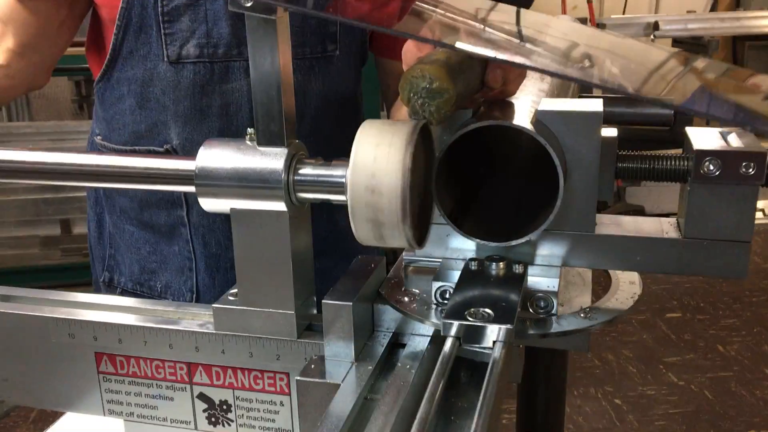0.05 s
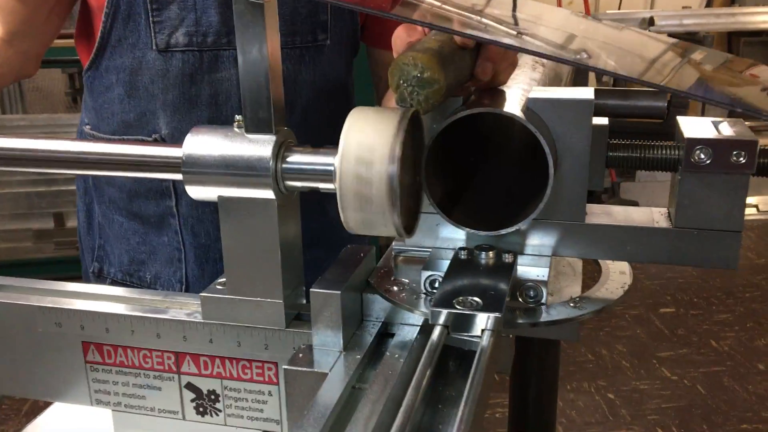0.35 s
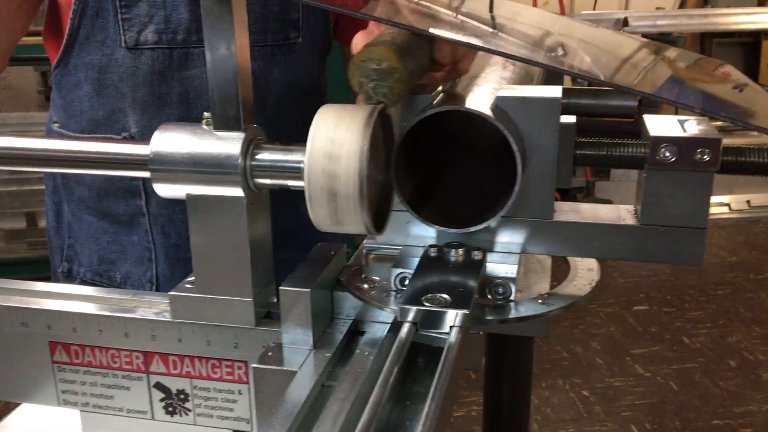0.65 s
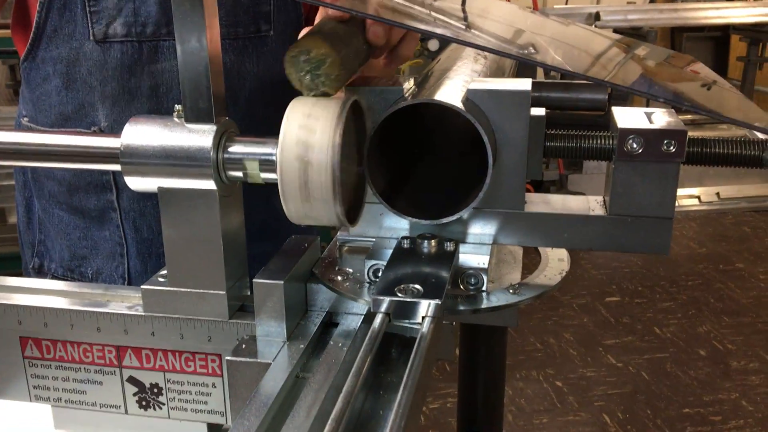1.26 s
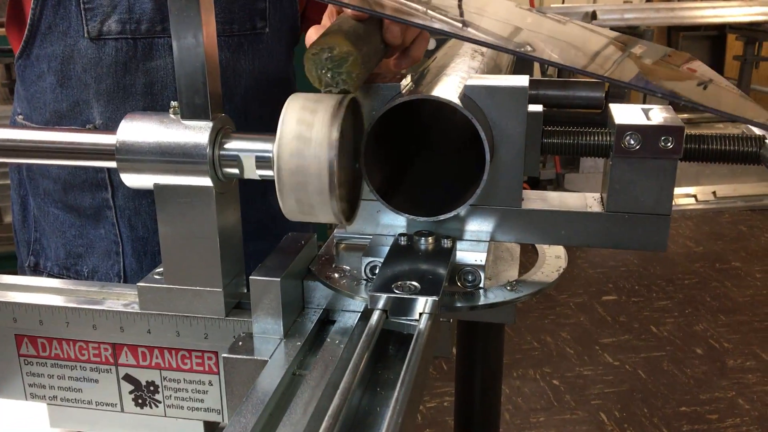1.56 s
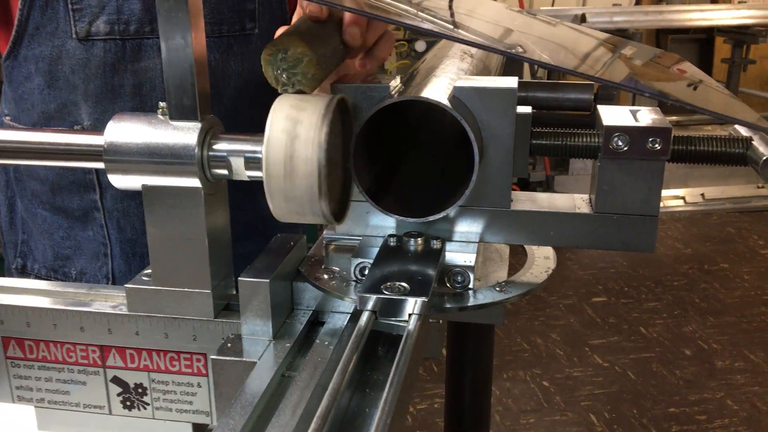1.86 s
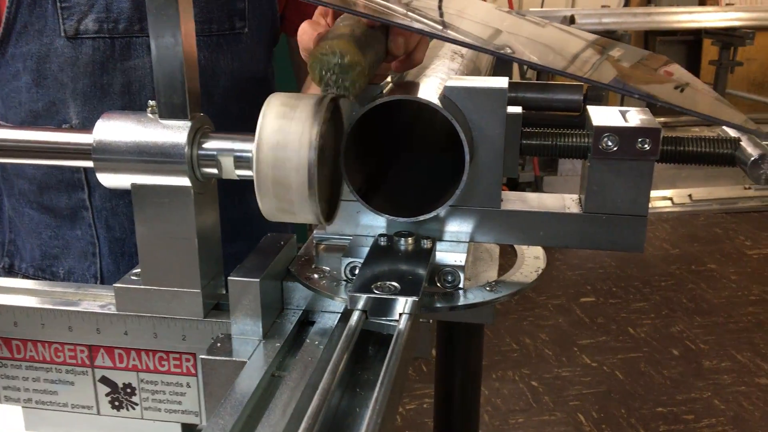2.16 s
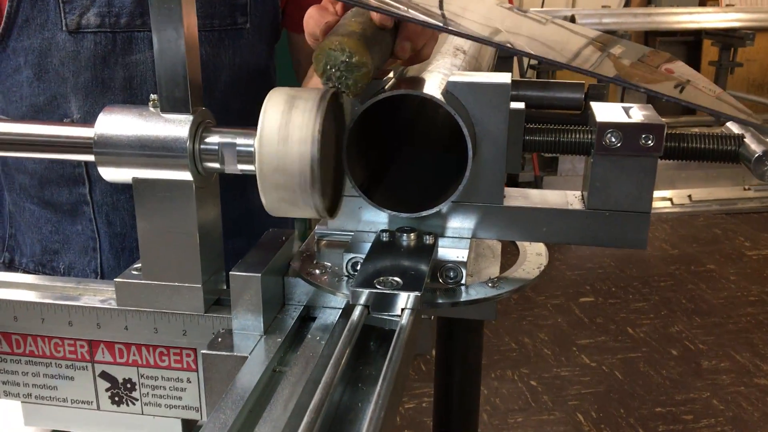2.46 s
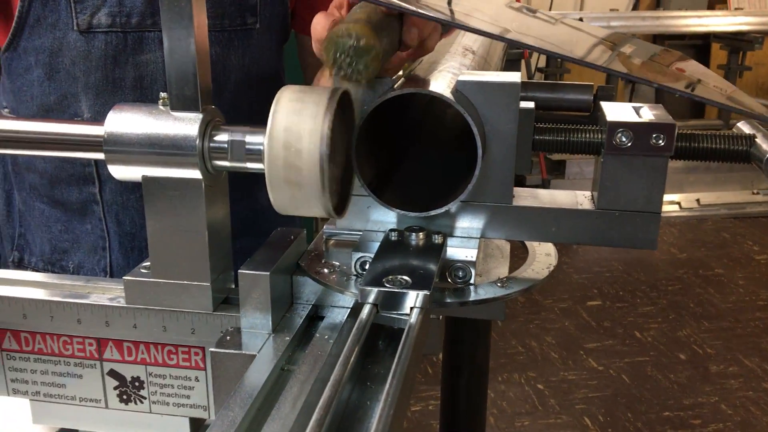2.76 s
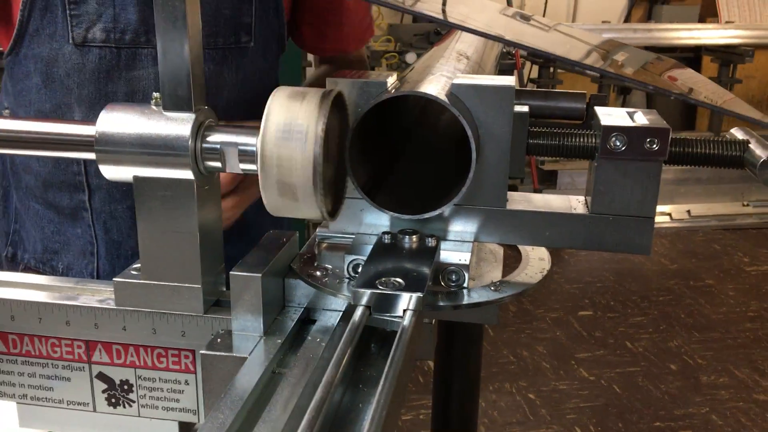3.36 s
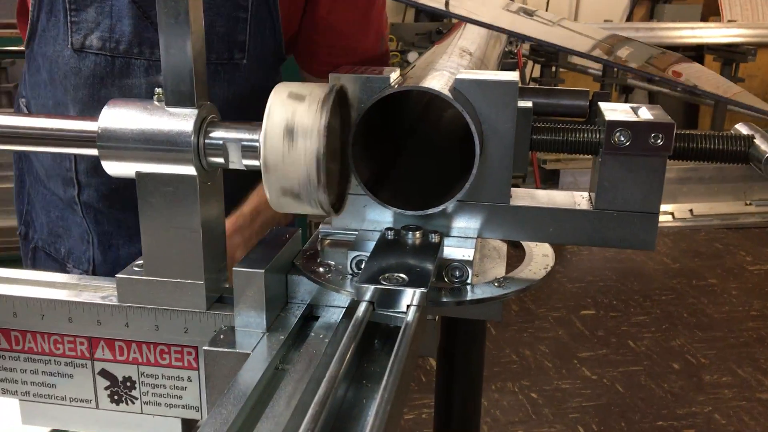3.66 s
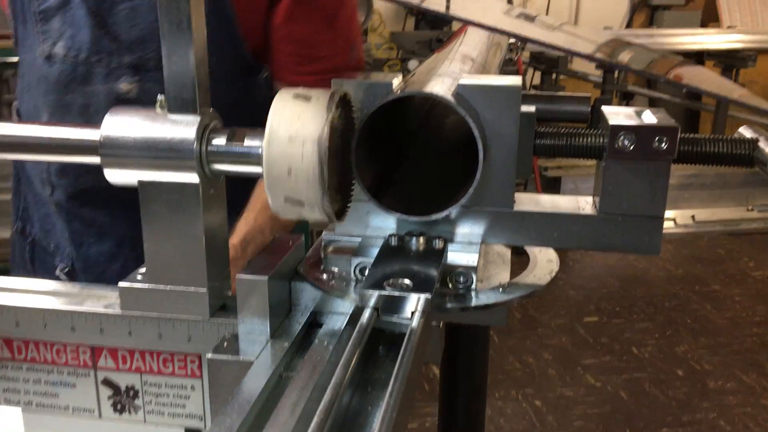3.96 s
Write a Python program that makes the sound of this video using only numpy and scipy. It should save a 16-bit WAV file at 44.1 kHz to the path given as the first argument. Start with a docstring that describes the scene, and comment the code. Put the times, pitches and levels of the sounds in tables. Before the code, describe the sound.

A tubing notcher's electric drill whirs loudly at full speed from the start, close by in a workshop, with high tones over gently pulsing fan air and gear rattle. At about 2.9 seconds it switches off and coasts down, its gears giving a rasping whine that falls in pitch and fades. At about 3.9 seconds, as it nearly stops, a dull thump briefly rings the steel frame.

```python
"""A workshop, one microphone close to a tubing notcher whose hole saw an electric drill spins in the air.
At first the drill runs at full speed: shaft tones sing over fan air and gear rattle, and air and rattle
pulse with the turning of a slow gear. Near 2.9 s it is switched off and coasts down with a falling
whine in its gearbox. At 3.9 s a dull thump rings the steel frame."""
import sys
import numpy as np
from scipy import signal
from scipy.fft import rfft, irfft, next_fast_len
from scipy.io import wavfile
from scipy.ndimage import uniform_filter1d, map_coordinates

SR = 44100
rng = np.random.default_rng(int(sys.argv[2]) if len(sys.argv) > 2 else 0)


def unload_audio(sound):
    """Save the sound as a 16-bit wav file, at the path given as the first command line argument."""
    columns = np.transpose(np.atleast_2d(sound))
    # keep every value between -1 and 1, then stretch to whole-number steps
    steps = np.round(np.clip(columns, -1, 1) * 32767)
    wavfile.write(sys.argv[1], SR, steps.astype(np.int16))


N = 176400
TIME = np.arange(N) / SR
FULL_HZ, OFF_S = 474, 2.9  # shaft rate at which speed = 1; the moment the power is cut
# thumps on the frame (time [s], gain [dB])
THUMPS = [(3.905, -23.5)]


def amp(db):
    """Decibels to gain."""
    return 10 ** (np.asarray(db) / 20)


def unit(x):
    """Scale to rms 1."""
    return x / np.sqrt(np.mean(x ** 2) + 1e-20)


def curve(rows):
    """(time, value) points as one value per sample."""
    return np.interp(TIME, *np.transpose(rows))


def wobble(rate):
    """A smooth random curve, rate knots a second."""
    return map_coordinates(rng.standard_normal(N // 8), [TIME * rate + 2], mode="wrap")


def filtered(x, response):
    """x through a response given as a function of frequency."""
    size = next_fast_len(N + SR // 2)
    return irfft(rfft(x, size) * response(np.fft.rfftfreq(size, 1 / SR)), size)[..., :N]


def coloured(x, points):
    """x shaped by (frequency [Hz], level [dB]) points, at rms 1."""
    hz, db = np.transpose(points)
    return unit(filtered(x, lambda f: amp(np.interp(np.log(f + 1), np.log(hz + 1), db))))


def resonate(x, peaks):
    """x through steep resonances (frequency [Hz], width [Hz], level [dB]), at rms 1."""
    def band(f, hz, width):
        return 1j * f * width / (hz * hz - f * f + 1j * f * width)
    return unit(filtered(x, lambda f: sum(amp(db) * band(f, hz, width) ** 2 for hz, width, db in peaks)))


def patchy_noise(spread_db):
    """White noise whose gain varies in random patches of time and frequency."""
    spectra = signal.stft(rng.standard_normal(N), nperseg=1024)[2]
    patches = uniform_filter1d(rng.standard_normal(spectra.shape), size=5, axis=0)
    patches = uniform_filter1d(patches, size=16, axis=1, mode="wrap")
    return signal.istft(spectra * amp(spread_db * unit(patches)), nperseg=1024)[1][:N]


def tone(hz, jitter, rate):
    """A sine of rms 1 whose pitch trembles by the fraction jitter, at rate knots a second."""
    cycles = np.cumsum(hz * (1 + jitter * wobble(rate))) / SR
    return np.sqrt(2) * np.sin(2 * np.pi * (cycles + rng.random()))


def room_tone():
    """The workshop's own faint, steady rumble."""
    # background spectrum (frequency [Hz], relative level [dB])
    rumble = [(20, -25), (30, -5), (38, 4), (49, -8), (62, -0.5), (80, -8.5), (105, -16.5), (190, -21.5),
              (420, -44), (900, -90)]
    return amp(-54) * coloured(rng.standard_normal(N), rumble)


def workshop(direct, t60_s=0.21, room_db=-8, drift_s=0.4):
    """Direct sound and a short reverberation above the bass, whose pattern drifts as things move."""
    t, wet = np.arange(SR // 4) / SR, np.zeros(N)
    for centre_s in np.arange(0, N / SR + drift_s, drift_s):
        crossfade = np.cos(np.pi / 2 * np.clip((TIME - centre_s) / drift_s, -1, 1))
        tail = rng.standard_normal(len(t)) * amp(-60 * t / t60_s)
        wet += signal.oaconvolve(direct * crossfade, tail / np.linalg.norm(tail))[:N]
    wet = filtered(wet, lambda f: f ** 2 / (f ** 2 + 600 ** 2))
    return (direct + amp(room_db) * wet) / np.hypot(1, amp(room_db))


def bumps(hz=119, rise_s=0.007):
    """Soft handling bumps: short low pushes that barely ring."""
    # pushes (time [s], envelope peak [dB])
    pushes = [(2.657, -43.5), (3.345, -43)]
    out = np.zeros(N)
    for start_s, db in pushes:
        age = np.maximum(TIME - start_s, 0)
        out += amp(db) * age / rise_s * np.exp(1 - age / rise_s) * np.sin(2 * np.pi * hz * age)
    return out


def tick(delay_s=0.008, t60_s=0.06):
    """A faint burst of dull hiss just after the thump begins."""
    ages = [TIME - start_s - delay_s for start_s, _ in THUMPS]
    hiss = coloured(rng.standard_normal(N), [(500, 0), (5000, -5), (15000, -6)])
    return amp(-52) * hiss * sum((age > 0) * amp(-60 * np.abs(age) / t60_s) for age in ages)


def frame(hum_hz=240, hum_width_hz=16, rise_s=0.021):
    """The steel frame hums with the motor and rings when thumped."""
    # the frame's hum (time [s], level [dB])
    hum_levels = [(0, -58), (2.8, -66), (3.05, -52), (3.33, -53), (3.43, -44), (3.58, -47), (3.7, -55),
                  (3.9, -58)]
    # the frame's modes (frequency [Hz], relative level [dB], t60 [s])
    modes = [(42.6, -14, 0.44), (75.6, -6, 0.22), (122, -14, 1), (241.5, 3, 0.54), (284, 7, 0.087),
             (417, -7, 0.23), (444, 3.5, 0.07), (608, -22, 0.37)]
    out = amp(curve(hum_levels)) * resonate(rng.standard_normal(N), [(hum_hz, hum_width_hz, 0)])
    for start_s, db in THUMPS:
        age = np.maximum(TIME - start_s, 0)
        ring = sum(amp(level - 60 * age / t60) * np.sin(2 * np.pi * hz * age) for hz, level, t60 in modes)
        out += amp(db) * (1 - np.exp(-age / rise_s)) * ring
    return out


def motor_hum(shaft_hz, speed, fall_db_per_s=130, drone_hz=236.6):
    """The low hum and drone die when the power is cut; a faint shaft tone glides on."""
    # hum of the powered motor (frequency [x shaft rate], level [dB])
    partials = [(0.249, -63), (0.334, -70)]
    # drone at half the full shaft rate, sagging now and then (time [s], level [dB])
    drone_levels = [(0, -47), (.07, -50), (.12, -59), (.17, -46), (.36, -45), (.47, -56), (.53, -47),
                    (.72, -44), (.93, -48), (1.0, -43), (1.14, -43.5), (1.21, -57), (1.29, -43),
                    (1.45, -47), (1.51, -54), (1.63, -43), (1.75, -50), (1.82, -43), (2.1, -44),
                    (2.32, -47), (2.45, -42.5), (2.86, -46.5), (2.93, -47), (3.0, -79)]
    power_db = -fall_db_per_s * np.maximum(TIME - OFF_S, 0)
    hum = sum(amp(db + power_db) * (1 + 0.32 * wobble(8.8)) * tone(order * shaft_hz, 0.0045, 29.7)
              for order, db in partials)
    drone = amp(curve(drone_levels) + 2.0 * wobble(21.8)) * tone(drone_hz, 0.0037, 30.1)
    shaft = amp(-45.5 + 0.63 * wobble(12)) * speed ** 4 * tone(shaft_hz, 0.0038, 60)
    return hum + drone + shaft


def shaft_tones(shaft_hz, speed, flutter_db=2.5):
    """Fluttering motor and gear tones follow the shaft; the third harmonic is rough."""
    # motor and gear tones (frequency [x shaft rate], level at full speed [dB])
    partials = [(2.035, -48.5), (2.16, -43), (2.32, -47.5), (2.427, -45.5), (2.785, -46), (4.41, -49),
                (6, -43), (6.505, -47), (7.83, -42.5), (8.12, -40.5), (10.02, -47), (14.03, -50),
                (16.49, -46), (17.97, -51), (23.97, -56)]
    # the tone at three times the shaft rate (time [s], level [dB])
    third_levels = [(0, -31), (.3, -31.5), (.8, -34), (1.15, -45), (1.7, -53), (2.3, -41), (2.6, -31.5),
                    (2.85, -39), (3.15, -37.5), (3.4, -83)]
    tones = sum(amp(db) * unit(amp(flutter_db * wobble(21.2))) * tone(order * shaft_hz, 0.00168, 44.4)
                for order, db in partials)
    loose = np.clip((TIME - OFF_S) / 0.103, 0, 1)  # unpowered gears run loose: the pitch trembles more
    roughness = unit(1 + 0.6 * wobble(60))
    third = amp(curve(third_levels)) * roughness * tone(3 * shaft_hz, 0.0041 + 0.026 * loose, 110)
    return speed ** 7.2 * tones + third


def fan_whistle(shaft_hz, order=21, width_hz=70):
    """The fan's thin, unsteady whistle flares as the speed first drops."""
    # the whistle (time [s], level [dB])
    levels = [(0, -47), (.6, -42), (1.3, -44), (2.1, -43), (2.66, -42), (2.8, -46), (2.885, -34),
              (2.93, -47), (3.0, -70)]
    flicker = unit(amp(3.5 * wobble(13)) * wobble(width_hz))
    return amp(curve(levels)) * flicker * tone(order * shaft_hz, 0.00196, 60)


def gear_whine(shaft_hz, order=18.1, width_hz=340, spread_hz=80):
    """A rasping whine swells as the gears coast and falls in pitch with the shaft."""
    # the whine (time [s], level [dB])
    levels = [(2.85, -56), (2.93, -39), (3.0, -28), (3.04, -34), (3.09, -29), (3.16, -34.5), (3.24, -35),
              (3.3, -50), (3.36, -37), (3.42, -33), (3.48, -44), (3.56, -44), (3.66, -47), (3.72, -33),
              (3.78, -41), (3.84, -42), (3.97, -55)]
    hz = order * shaft_hz
    rasp = sum(wobble(width_hz) * tone(hz, spread_hz / hz, 200) for _ in range(3))
    return amp(curve(levels)) * unit(rasp)


def gears(speed, turns, teeth=9, treble_hz=3130):
    """Every tooth gives a short scrape of slightly uneven force and rings the gearbox."""
    # gear rattle (frequency [Hz], relative level [dB])
    spectrum = [(150, -28), (300, -19), (420, -24.5), (650, -23), (820, -20), (950, -16.5), (1200, -13),
                (1440, -7), (1700, -6.5), (1900, -7.5), (2370, -4.5), (2600, -10.5), (2880, -10),
                (3400, -8), (4010, -7), (4950, -12), (6170, -9), (7100, -9), (7600, -16.5), (8100, -16),
                (9000, -30), (9700, -22), (10300, -41), (10800, -20), (11400, -27.5), (12500, -34),
                (15600, -44)]
    # gearbox resonances (frequency [Hz], width [Hz], relative level [dB])
    gearbox = [(1044, 110, -18), (1390, 120, -22), (2384, 240, 0), (3885, 290, 0.5), (4290, 250, -4),
               (6105, 220, 2), (6550, 270, -0.5), (7120, 140, -2), (11460, 200, -9)]
    # the gearbox's ringing (time [s], level [dB])
    ring_levels = [(0, -32), (.8, -34.5), (1.8, -35), (2.3, -34), (2.9, -32.5), (3.2, -35), (3.5, -35.5),
                   (3.75, -44.5), (4.0, -66)]
    scrape = (1 + 0.5 * np.cos(2 * np.pi * teeth * turns)) * np.exp(0.058 * wobble(500))
    rattle = coloured(scrape * rng.standard_normal(N), spectrum)
    body = filtered(rattle, lambda f: 1 / (1 + (f / treble_hz) ** 4))
    ring = amp(curve(ring_levels)) * resonate(scrape * patchy_noise(spread_db=3), gearbox)
    # slower teeth strike more softly and lose treble
    treble = amp(0.5) * speed ** 0.84 * (rattle - body)
    return ring + amp(-28) * speed ** 0.45 * (body + treble)


def fan(speed):
    """Air rushes through the housing and rings its resonances, fading as the motor slows."""
    # fan air (frequency [Hz], relative level [dB])
    spectrum = [(60, -45), (170, -25), (300, -26), (430, -14.5), (560, -10.5), (723, -7), (820, -7),
                (987, -0.5), (1130, -4), (1250, -2.5), (1400, -1), (1730, -10.5), (2050, -1.5), (2400, -6),
                (2680, -6), (3080, -5.5), (3480, -12.5), (3840, -5.5), (4300, -7.5), (4950, -12),
                (5400, -6.5), (5650, -6), (5900, -9), (6620, -12), (7200, -12), (7600, -18), (7850, -14.5),
                (8250, -16), (8950, -20), (9300, -13.5), (9550, -16.5), (9900, -22.5), (10350, -22),
                (10750, -10), (11050, -21.5), (11350, -16), (12000, -19), (14100, -22), (15600, -27.5)]
    # housing resonances (frequency [Hz], width [Hz], relative level [dB])
    housing = [(993, 360, -3), (1404, 220, -5.5), (2140, 450, -7.5), (3793, 210, 1), (6540, 350, -8.5),
               (7380, 170, -6), (9350, 290, -6.5), (9840, 530, -4.5), (10810, 500, -13.5)]
    air = amp(-25) * speed ** 1.97 * coloured(patchy_noise(spread_db=0), spectrum)
    ring = amp(-35) * speed ** 2.6 * resonate(patchy_noise(spread_db=3), housing)
    return air + ring


def scene(slow_gear_ratio=0.0787, pulse_depth=0.1):
    """One motor speed drives the machine; the microphone feeds both channels alike."""
    # the motor running, then coasting down (time [s], shaft rate [Hz])
    shaft_rates = [(0, 472.9), (.7, 473.8), (1.3, 473.6), (2.0, 470.1), (2.6, 470.7), (2.85, 473.2),
                   (2.96, 423.6), (3.1, 349.1), (3.24, 297.7), (3.42, 226.3), (3.53, 181.7), (3.73, 127.4),
                   (3.88, 81.4), (4.0, 35.9)]
    shaft_hz = curve(shaft_rates)
    speed, turns = shaft_hz / FULL_HZ, np.cumsum(shaft_hz) / SR
    pulsing = (1 + pulse_depth * np.sin(2 * np.pi * slow_gear_ratio * turns)) * amp(0.3 * wobble(14))
    rush = pulsing * (fan(speed) + gears(speed, turns))
    tones = shaft_tones(shaft_hz, speed) + fan_whistle(shaft_hz) + gear_whine(shaft_hz)
    machine = workshop(rush + tones + tick())
    low = motor_hum(shaft_hz, speed) + frame() + bumps() + room_tone()
    return np.array([machine + low, machine + low])


def record(dry, low_cut_hz=33, top_hz=15750):
    """The recorder cuts the deepest bass and keeps nothing above its band limit."""
    return filtered(dry, lambda f: (f < top_hz) * f ** 8 / (f ** 8 + low_cut_hz ** 8))


dry = scene()
out = record(dry)
unload_audio(out)
```